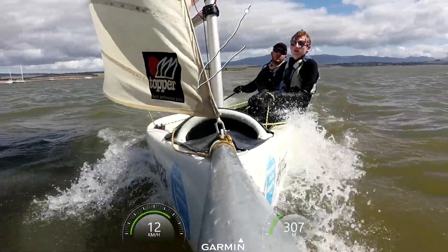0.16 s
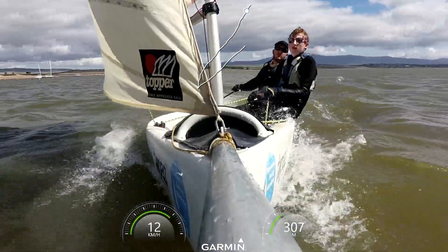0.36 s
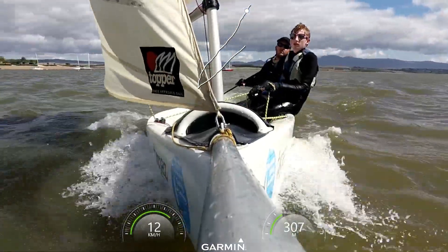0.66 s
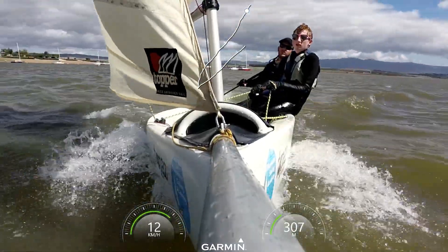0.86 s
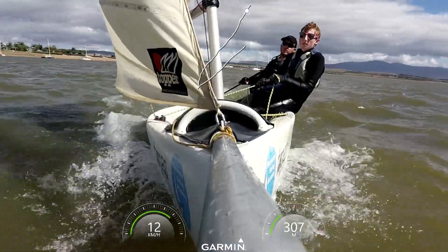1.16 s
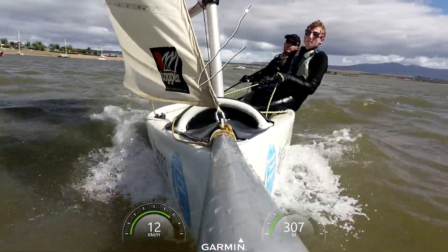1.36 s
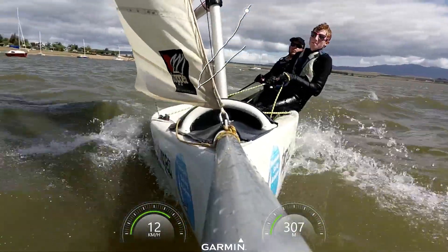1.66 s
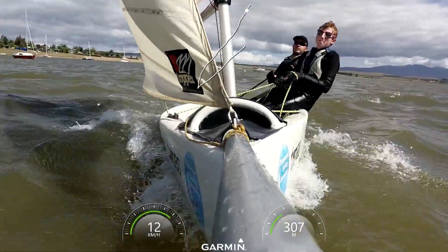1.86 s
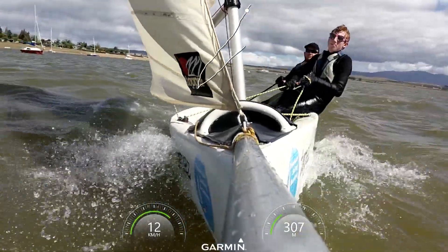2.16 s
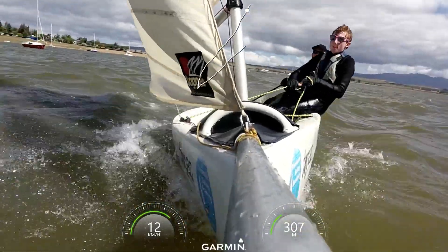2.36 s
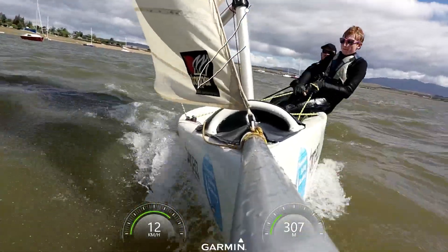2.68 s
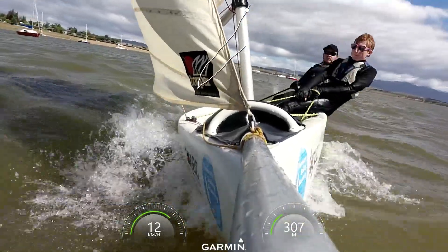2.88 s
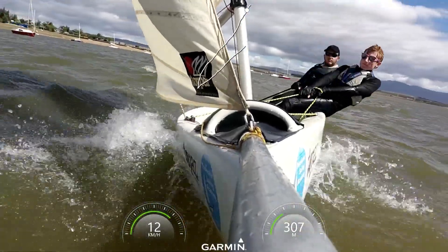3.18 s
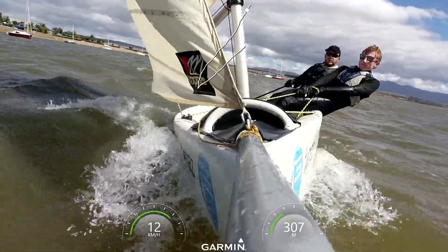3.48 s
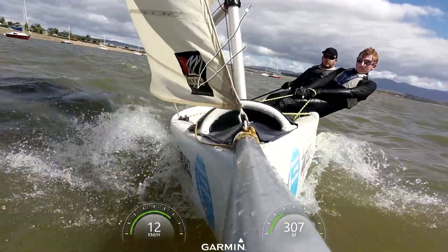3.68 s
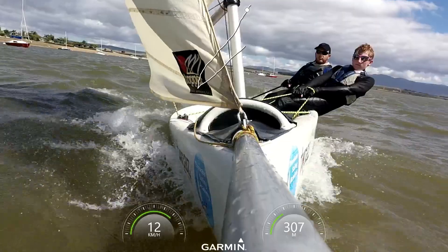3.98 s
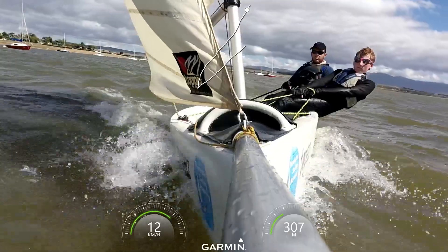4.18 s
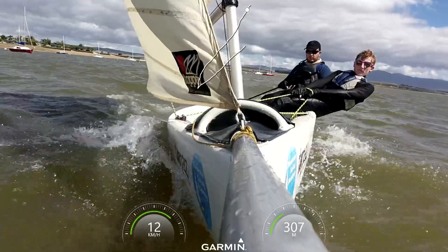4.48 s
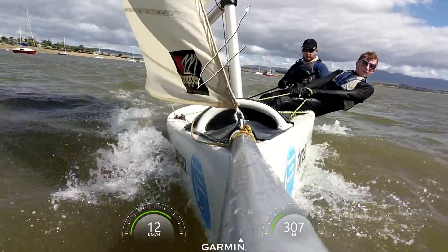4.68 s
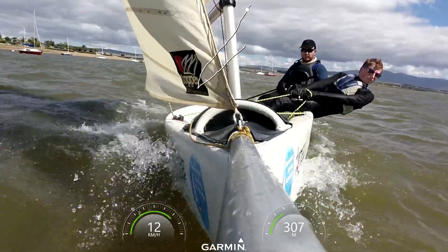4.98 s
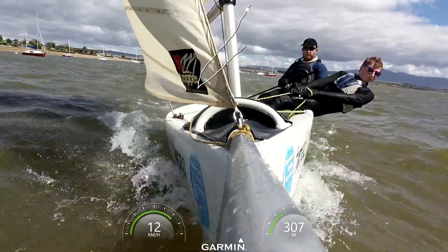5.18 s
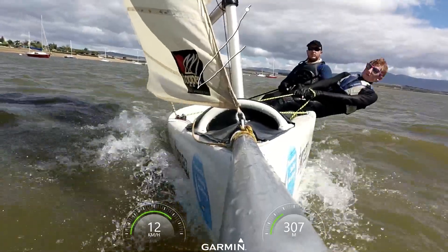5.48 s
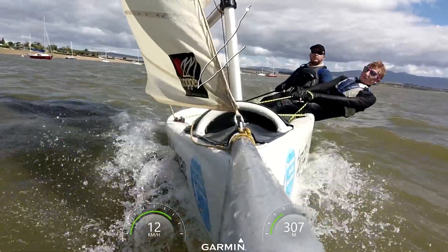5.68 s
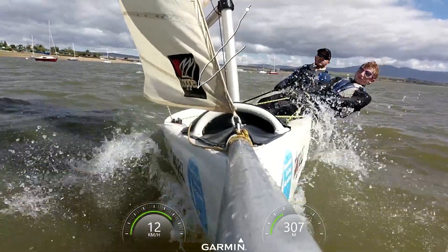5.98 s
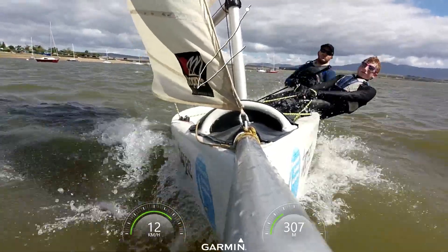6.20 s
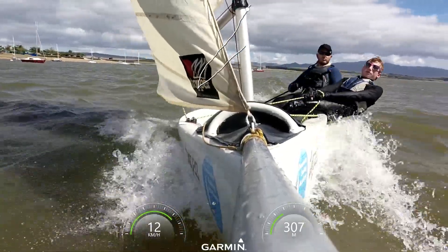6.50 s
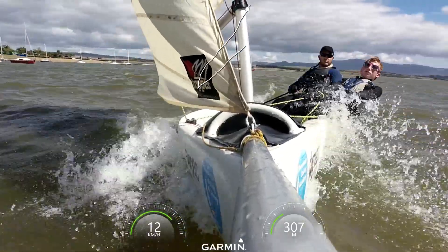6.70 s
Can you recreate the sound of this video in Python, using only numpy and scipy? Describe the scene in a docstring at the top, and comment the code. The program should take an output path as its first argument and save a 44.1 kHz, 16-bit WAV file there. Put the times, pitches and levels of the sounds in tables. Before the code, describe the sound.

Heard from a sealed camera fixed at the bow of a small sailing dinghy, fast low thumps from the fluttering sail dominate, over wind rumble and gurgling wash. Drops knock on the casing and waves slap the hollow hull. The flapping weakens around 1.5 to 2 and 4.5 to 5 seconds, exposing more water. Spray smacks the microphone near 1.9, 6.0 and 6.8 seconds. Treble is muffled.

```python
"""A small dinghy planes through chop, heard by a sealed camera clamped to the bowsprit, with dulled treble.
It opens with the strongest wash; the fluttering foresail thumps the pole about 27 times a second (shaped swings).
Strong flaps pause near 1.5-2 s and 4.5-5.1 s. Drops knock (ringing tones) and waves slap the hull throughout.
Spray hits the camera near 1.9, 6.0 and 6.8 s and overloads the recorder. Water (filtered random drops)
and wind (filtered noise) run from start to end."""
import sys
import numpy as np
from scipy import signal
from scipy.fft import rfft, irfft, next_fast_len
from scipy.io import wavfile
from scipy.ndimage import uniform_filter1d, map_coordinates

SR = 44100
rng = np.random.default_rng(int(sys.argv[2]) if len(sys.argv) > 2 else 0)


def persist_wave(psi):
    """Save psi, clipped to +-1, as 16-bit WAV."""
    counts = np.round(np.clip(psi, -1, 1) * 32767).astype(np.int16)
    wavfile.write(sys.argv[1], SR, np.atleast_2d(counts).T)


N = 301644  # length [samples]

# strong flaps of the sail: (time of deepest pull [s], pull before smoothing [dB], swing rate [Hz],
# push before the pull [share of the pull])
STRONG_FLAPS = [(0.099, -10.5, 111, 0.53), (0.179, -8, 59, 0.2), (0.322, -4.5, 74.7, 0.37),
                (0.433, -13.5, 47.3, 1.6), (0.494, -4.5, 96.0, 0.4), (0.534, -8.5, 128, 0.55),
                (0.648, -9.5, 68.4, 2.75), (0.704, -10, 65, .6), (0.754, -6.5, 54.6, 1.0),
                (0.791, -11.5, 56.5, 1.5), (0.857, -9.5, 56.9, 0.51), (0.944, -8, 53.0, 0.34),
                (0.98, -8, 65, .6), (1.049, -4.5, 64, 0.65), (1.142, -11, 89, 0.6),
                (1.238, -4.5, 83.3, 0.71), (1.374, -8, 73.6, 0.46), (1.418, -6, 72.0, 1.0),
                (1.501, -10, 61.7, 1.5), (1.537, -6.5, 69.4, 0.7), (2.028, -6.5, 49.6, 0.6),
                (2.061, -9, 65, .6), (2.145, -10.5, 70, 1.1), (2.535, -7, 95, 0.53),
                (2.696, -3.5, 75.2, .75), (2.733, -8, 74, 1.9), (2.844, -6.5, 66.6, 0.52),
                (2.918, -8, 75.0, 1.05), (2.998, -11, 58.4, 0.33), (3.115, -9, 73.51, 0.66),
                (3.155, -5, 72, 0.65), (3.314, -7.5, 72, 0.81), (3.477, -8, 61.3, 0.33),
                (3.56, -10, 65, .6), (3.883, -7, 75.0, 0.6), (3.972, -5.5, 84.0, 0.88),
                (4.016, -7.5, 77, 1.85), (4.088, -7, 70, 1.1), (4.158, -3.5, 105, 1.78),
                (4.198, -10, 73.6, 1.5), (4.274, -7.5, 77, 1.7), (4.349, -10.5, 77, 0.55),
                (4.476, -9, 83.0, 0.7), (5.104, -5, 71.7, 0.89), (5.143, -5.5, 65.09, 0.37),
                (5.176, -6.5, 67.6, 0.3), (5.405, -10, 60, .3), (5.485, -5.5, 60.7, 0.91),
                (5.521, -6.5, 75.3, 0.66), (5.56, -12, 63, 0.7), (5.696, -9.5, 53.5, 0.7),
                (6.046, -7, 62.2, 0.8), (6.085, -12, 65, .4), (6.13, -8, 66.0, 0.41), (6.164, -11, 65, .4),
                (6.391, -10.5, 54, 0.3), (6.555, -8.5, 56.3, 1.1), (6.595, -8, 65, .6),
                (6.776, -8, 74.6, 0.32)]
# how hard the cloth beats between strong flaps, before random variation: (time [s], pull [dB])
WEAK_FLAP_LEVEL = [(0, -13), (1.05, -12), (1.3, -17.5), (1.65, -19.5), (1.95, -16.5), (2.1, -10),
                   (2.3, -18), (2.78, -11.5), (3.4, -15.5), (3.85, -16), (4.05, -11), (4.23, -18),
                   (4.31, -10), (4.55, -21), (4.95, -18.5), (5.06, -12), (5.3, -17.5), (5.55, -14),
                   (5.8, -19), (6.17, -14), (6.84, -16)]
# big drops striking: (time [s], ring peak before a -2 dB ceiling [dB], pitch the blow favours [Hz])
BIG_DROPS = [(0.151, -12, 739.9), (0.465, -8, 1035), (0.552, -9.5, 1085), (0.605, -7.5, 842.3),
             (0.62, -7, 1064), (0.678, -9.5, 1099), (1.046, -9, 994.8), (1.144, -10, 761.1),
             (1.204, -11, 1111), (1.365, -6.5, 813), (1.372, -5.5, 1127), (1.382, -3, 831.7),
             (1.391, -5, 660.4), (1.866, -5.5, 842.1), (2.035, -4.5, 800.9), (2.197, -12, 799.6),
             (2.238, -10, 1067), (2.248, -9, 653), (2.255, -7, 960), (2.652, -6.5, 836),
             (2.955, -9.5, 1133), (3.004, -4.5, 650.8), (3.19, -13, 899.6), (3.217, -12, 771),
             (3.319, -12, 943.7), (3.477, -12.5, 1001), (3.543, -14.5, 1189), (3.557, -9, 762.9),
             (3.644, -7, 850), (3.937, -7, 1000), (3.942, -3, 814.4), (4.103, -6.5, 888.8),
             (4.567, -2.5, 859.5), (4.607, -8, 620), (4.675, -13, 1000), (4.694, -13, 1250),
             (4.757, -10, 921), (4.811, -18, 828), (4.834, -4.5, 913.5), (5.179, -11.5, 1045),
             (5.403, -9, 1000), (5.449, -12, 900), (5.455, -13, 880), (6.002, -4, 771.8),
             (6.165, -12.5, 803.8), (6.452, -3, 957.3), (6.515, -10.5, 1062), (6.743, -11, 1150)]
# tones that pole and casing ring with, before detuning:
# (pitch [Hz], relative level [dB], time to fade by 60 dB [s])
CASING_TONES = [(480.4, -10.5, 0.094), (677.78, 5, 0.017635), (888.59, 1.5, 0.024182), (997.33, -1, 0.026),
                (1190.7, -3, 0.03)]
# spray landing straight on the camera: (time of contact [s], level before overshoot [dB], pitch [Hz])
CAMERA_HITS = [(1.871, -1, 899), (6.008, -1, 856), (6.805, -1, 1000)]
# waves slapping the hollow hull: (time [s], level before the fade shape [dB], pitch [Hz])
HULL_SLAPS = [(0.151, -9.5, 318.7), (0.415, -8, 296.3), (0.554, -12, 284.8), (0.624, -10, 297.2),
              (1.337, -12, 319.5), (1.357, -12, 363.6), (1.386, -6.5, 397.8), (1.406, -10, 305.3),
              (1.846, -7.5, 328), (2.25, -11, 358.2), (2.635, -7, 330.8), (2.659, -3.5, 304),
              (3.94, -5, 265.2), (3.957, -7, 273.5), (4.576, -11.5, 356.3), (4.693, -13, 339.3),
              (6.011, -12, 329.7), (6.515, -12, 315.3)]
# handfuls of spray on pole and hull: (time of middle [s], patter level at middle [dB], half-length [s])
SPRAY_GUSHES = [(0.271, -29, 0.035), (0.393, -22, 0.014), (1.029, -22, 0.02), (1.24, -23, 0.012),
                (1.285, -25, 0.024), (1.309, -19, 0.013), (1.337, -19, 0.017), (1.526, -22, 0.018),
                (1.572, -22, 0.023), (1.607, -21, 0.011), (1.688, -25, 0.012), (1.754, -24, 0.02),
                (1.839, -22, 0.028), (1.941, -26, 0.01), (2.005, -23, 0.013), (2.429, -21, 0.032),
                (2.463, -24, 0.041), (2.535, -22, 0.015), (2.576, -23, 0.025), (2.631, -18, 0.023),
                (2.731, -25, 0.018), (2.873, -20, 0.016), (2.916, -21, 0.014), (2.961, -22, 0.026),
                (3.276, -27, 0.019), (3.351, -24, 0.011), (3.433, -23, 0.025), (3.877, -27, 0.025),
                (3.928, -20, 0.027), (4.272, -26, 0.017), (4.482, -25, 0.017), (4.572, -16, 0.021),
                (4.628, -24, 0.02), (5.048, -30, 0.02), (5.286, -25, 0.031), (5.329, -22, 0.016),
                (6.083, -25, 0.011), (6.119, -27, 0.026), (6.474, -22, 0.04), (6.575, -27, 0.041),
                (6.636, -23, 0.033), (6.714, -23, 0.022), (6.748, -19, 0.021), (6.767, -22, 0.029)]
# small bright spatters on the casing: (start [s], level before the fade shape [dB], pitch [Hz])
BRIGHT_TICKS = [(0.104, -22, 2896), (0.588, -14, 3002), (1.744, -31, 3081), (1.819, -24, 2740),
                (2.035, -20.5, 2801), (3.429, -15.5, 2787), (4.118, -20.5, 2750), (4.482, -26, 2780),
                (5.185, -42, 4650), (5.464, -16.5, 2864), (5.622, -16, 2829), (5.721, -24, 2941),
                (5.76, -40, 4400)]
# steady wash along the hull, without splashes: (time [s], surge [dB], drop patter [dB], fizz [dB])
STEADY_WATER = [(0.0, -23, -27.5, -49), (0.34, -25.5, -26, -46), (0.55, -22, -23, -43.5),
                (0.78, -25, -31, -57), (1.2, -27, -31, -59), (1.47, -27.5, -36.5, -63),
                (1.56, -29, -31, -57), (2.0, -28, -31, -59), (2.12, -27.5, -36, -61), (2.5, -30, -31, -58),
                (2.8, -30, -35, -61), (3.4, -30.5, -31, -54), (3.7, -28.5, -35, -56),
                (4.05, -27, -32.5, -61), (4.28, -35, -38, -62), (4.65, -29, -32, -62), (4.9, -36, -38, -54),
                (5.2, -28, -33, -55), (5.64, -34, -36, -54), (5.95, -33, -35, -53), (6.06, -28, -32, -52),
                (6.4, -31.5, -34.5, -49), (6.65, -26, -28.5, -50), (6.84, -28, -31.5, -47)]
# swells of spray thrown at the bow; a long splash is built from overlapping swells:
# (time of peak [s], fizz [dB], build-up over 20 dB [s], die-away over 20 dB [s])
SPRAY_SWELLS = [(0.03, -41, .1, 0.1984), (0.6, -38.5, .1, .12), (0.69, -44, .06, .08),
                (0.96, -44.5, .4, 0.322), (1.33, -41.5, .05, 0.0939), (1.38, -37, .1, 0.0351),
                (1.7, -52, .3, 0.1478), (1.83, -42, .03, 0.15), (1.87, -38, .06, 0.0291),
                (2.04, -42, .09, 0.091), (2.25, -46, .1, 0.094), (2.439, -45.5, .2, 0.2473),
                (2.66, -43.5, .25, 0.1063), (2.87, -43, .08, 0.2617), (2.97, -45, .2, 0.0752),
                (3.19, -47, .03, 0.0839), (3.33, -46, .12, 0.1839), (3.42, -38, .06, 0.1342),
                (3.49, -46, .05, .08), (3.63, -42.5, .06, .1), (3.74, -49, .02, 0.0819),
                (3.94, -37.5, .09, 0.0726), (4.11, -33, .03, 0.0462), (4.27, -52, .04, .06),
                (4.48, -50, .06, .05), (4.56, -39, .04, 0.1415), (4.675, -45, .02, 0.0544),
                (4.82, -48, .03, 0.066), (5.04, -48, .08, 0.0544), (5.13, -39.5, .04, 0.2172),
                (5.2, -43, .08, 0.0755), (5.41, -45, .03, 0.134), (5.46, -43, .06, 0.125),
                (5.65, -44, .15, .2), (5.73, -45, .08, .1), (6.004, -31, .008, .025), (6.04, -42, .03, .04),
                (6.11, -45, .06, .1), (6.46, -35, .07, 0.106), (6.63, -41, .09, 0.0476),
                (6.75, -42, .15, .15), (6.8, -41, .05, .03)]
# airy hiss that drifts slowly: (time [s], level [dB])
AIR_LEVEL = [(0.05, -71.5), (1.63, -81), (3.87, -77), (4.17, -83.5), (5.83, -74), (6.75, -74)]
# wind pressing on the casing: (time [s], level [dB])
GUST_LEVEL = [(0, -24), (1.5, -28), (3, -28), (4.7, -29), (5.3, -26), (6.84, -24)]
# colours of the noises, from low to high: (pitch [Hz], relative strength per Hz [dB])
RUMBLE_COLOUR = [(10, -33.5), (22, -1.5), (45, -1), (90, -13.5), (160, -17), (300, -46), (600, -93.5)]
SURGE_COLOUR = [(70, -41.5), (140, 3), (250, 2.5), (310, 1.5), (370, -1), (460, 1), (600, -13.5),
                (1000, -40.5), (2000, -91)]
PATTER_COLOUR = [(300, -31), (520, -4), (720, -1.5), (920, -0.5), (1100, -5), (1290, -2), (1600, -16),
                 (1900, -35), (3000, -70.5)]
FIZZ_COLOUR = [(1300, -22), (1900, -3.5), (2150, 0.5), (2500, 1.5), (2950, 0), (3500, -12.5), (4000, -26),
               (4600, -60)]
MIST_COLOUR = [(3300, -20), (3800, -1), (4300, -7), (4700, -16), (5500, -22), (11000, -25), (14500, -33)]
HISS_COLOUR = [(3000, -18), (5000, -3), (10000, -5), (12500, -7), (14000, -28.5)]

FLUTTER_HZ = 27.261  # beat of the cloth
TOP_HZ = 15700  # nothing at or above this is kept
CASING_DULLS_DB = 40.5  # loss of a lesser spatter per octave above 3 kHz
GUSH_BODY_DB, GUSH_FIZZ_DB = -3.5, -26.5  # hull and fizz in a gush, relative to patter
# dB gained for each dB that a splash adds to the fizz
SURGE_FOLLOWS, PATTER_FOLLOWS, MIST_FOLLOWS = 0.12, 0.3, 0.88
MIST_DB = -24.5  # finest spray, relative to the steady fizz


def sail():
    """The cloth jerks the pole: strong flaps, with weaker ones keeping the beat and leaning like their neighbours."""
    out = np.zeros(N)
    for s, db, hz, push in STRONG_FLAPS:
        add(out, s - .02, amp(db) * flap(hz, push))
    times, pushes = np.transpose(STRONG_FLAPS)[[0, 3]]
    beats = np.array([0, *times, N / SR])
    for start, stop in zip(beats, beats[1:]):
        steps = max(round((stop - start) * FLUTTER_HZ), 1)
        for s in np.linspace(start, stop, steps + 1)[1:-1]:
            late, size, pitch, lean = rng.standard_normal(4)
            db = np.interp(s, *np.transpose(WEAK_FLAP_LEVEL)) + 1.8 * size
            push = 0.7253 * np.interp(s, times, pushes) ** 0.94 * np.exp(0.1 * lean)
            hz = 62 * np.exp(.12 * pitch)
            add(out, s - .02 + 0.0025 * late, amp(db) * flap(hz, push))
    return out


def flap(hz, push):
    """One swing of the pole: a quick push, a slower pull deepest 20 ms in, then a damped rebound."""
    turns = (np.arange(round(.06 * SR)) / SR - .02) * hz
    # the swing runs faster before the deepest pull, and is still before the push
    turns = np.where(turns < 0, np.maximum(1.4512 * turns, -3 / 4), turns)
    damping = np.exp(-2.2 * np.maximum(turns, 0))
    size = np.where(turns < -1 / 4, push, damping)
    return uniform_filter1d(-size * np.cos(2 * np.pi * turns), size=45)


def knocks():
    """Each drop is a soft hammer: it rings the tones nearest its own pitch and bursts in a short spatter."""
    out, bursts = np.zeros(N), np.zeros(N)
    t = np.arange(round(.06 * SR)) / SR
    for s, db, hz in BIG_DROPS + lesser(count=70, top_db=-18, spread_db=10, hz=925.84, spread=.33):
        ring = np.zeros(len(t))
        for mode, level, t60 in CASING_TONES:
            closeness = np.exp(-(np.log(mode / hz) / 0.23814) ** 2)
            detuned_hz = mode * rng.normal(1, 0.04701)  # slightly detuned at random from blow to blow
            ring += amp(level) * fade(t, t60) * closeness * np.sin(2 * np.pi * detuned_hz * t)
        ring *= soft_start(t, 0.0015508)
        db = min(db, -2)  # keeps each ring short of overload by itself
        add(out, s - .002, amp(db) * ring / np.abs(ring).max())
        burst_db = db - 29 + rng.normal(0, 3)
        add(bursts, s - .003, amp(burst_db) * fade(t, 0.036) * soft_start(t, 0.0016))
    noise = rng.standard_normal(N)
    spatter = coloured(noise, FIZZ_COLOUR) + amp(-16) * coloured(noise, MIST_COLOUR)
    return out + bursts * spatter


def direct():
    """Spray swings the casing wall past full scale, deepest one cycle after contact, then it soon dies away."""
    out = np.zeros(N)
    t = np.arange(round(.04 * SR)) / SR - .003  # zero at the deepest point
    before = np.exp(-(t / .0009) ** 2)
    after = .65 * np.exp(-(t / .0008) ** 2) + .35 * fade(t, .03)
    shape = np.where(t < 0, before, after)
    overshoot_db = 3
    for s, db, hz in CAMERA_HITS:
        swing = shape * np.cos(2 * np.pi * hz * t)
        add(out, s + 1 / hz - .003, -amp(db + overshoot_db) * swing)
    return out


def slaps():
    """Each wave makes the hollow hull boom for a few swings; small ones plop in between."""
    out = np.zeros(N)
    t = np.arange(round(.06 * SR)) / SR
    shape = soft_start(t, 0.0028) * fade(t, 0.04934)
    for s, db, hz in HULL_SLAPS + lesser(count=45, top_db=-16, spread_db=8, hz=340, spread=.4):
        add(out, s - .005, amp(db) * shape * np.sin(2 * np.pi * hz * t))  # starts 5 ms early
    return out


def gushes():
    """Each handful of spray is a brief dense rattle of drops, heard in patter, hull and fizz at once."""
    shape = np.zeros(N)
    for s, db, half_length in SPRAY_GUSHES:
        add(shape, s - half_length, amp(db) * np.hanning(round(2 * half_length * SR)))
    spray = patches(drops(rate=900, spread_db=3.0, smooth_db=-3), depth_db=3.0)
    patter = coloured(spray, PATTER_COLOUR)
    body = amp(GUSH_BODY_DB) * coloured(spray, SURGE_COLOUR)
    fizz = amp(GUSH_FIZZ_DB) * coloured(spray, FIZZ_COLOUR)
    return shape * (patter + body + fizz)


def ticks():
    """Droplets too small to move the pole ring only briefly and high; the casing dulls the lesser ones."""
    out = np.zeros(N)
    t = np.arange(round(.02 * SR)) / SR
    shape = soft_start(t, .0012) * fade(t, 0.01)
    weak = []
    for s, db, hz in lesser(count=70, top_db=-32, spread_db=8.5, hz=3648, spread=.3):
        octaves_above = max(np.log2(hz / 3000), 0)
        weak.append((s, db - CASING_DULLS_DB * octaves_above, hz))
    for s, db, hz in BRIGHT_TICKS + weak:
        add(out, s, amp(db) * shape * np.sin(2 * np.pi * hz * t))
    return out


def water():
    """Hull surge, patter and fizz come in clumps that they partly share; every splash lifts them all."""
    surge_db, patter_db, fizz_db = curves(STEADY_WATER)
    lift_db = splash_db()
    clumps, flicker = wobble(16), wobble(45)

    surge_drops = drops(rate=300, spread_db=4.5, smooth_db=-2.5)
    surge_swell = amp(1.8 * clumps + 1.5 * flicker + 1.5 * wobble(30))
    surge = unit(surge_swell * coloured(surge_drops, SURGE_COLOUR))

    spray = drops(rate=600, spread_db=3.0, smooth_db=-4.5)  # the same drops feed patter, fizz and mist
    patter_swell = amp(1.3 * clumps + 2.4 * flicker)
    patter = unit(patter_swell * coloured(patches(spray, depth_db=2.5), PATTER_COLOUR))

    fine_spray = patches(spray + amp(2.0) * rng.standard_normal(N), depth_db=3.5)
    fizz_swell = amp(0.97 * clumps + 1.6 * flicker)
    fizz = unit(fizz_swell * coloured(fine_spray, FIZZ_COLOUR))

    mist_db = fizz_db + MIST_DB + MIST_FOLLOWS * lift_db + 2.0 * flicker
    return (amp(surge_db + SURGE_FOLLOWS * lift_db) * surge
            + amp(patter_db + PATTER_FOLLOWS * lift_db) * patter
            + amp(fizz_db + lift_db) * fizz
            + amp(mist_db) * coloured(spray, MIST_COLOUR))


def wash():
    """The wake further aft rushes and hisses evenly under the splashes, with a slowly drifting airy hiss."""
    rush = coloured(patches(rng.standard_normal(N), depth_db=2.5), PATTER_COLOUR)
    far_fizz = coloured(patches(rng.standard_normal(N), depth_db=2.5), FIZZ_COLOUR)
    air = amp(curves(AIR_LEVEL)[0]) * coloured(rng.standard_normal(N), HISS_COLOUR)
    return amp(-44.0) * rush + amp(-62.0) * far_fizz + air


def wind():
    """Gusts press on the casing as a rumble in short lumps of bounded size."""
    lumps = amp(4.0 * np.tanh(wobble(14)))
    rumble = unit(lumps * coloured(rng.standard_normal(N), RUMBLE_COLOUR))
    return amp(curves(GUST_LEVEL)[0]) * rumble


def splash_db():
    """How far swells of spray lift the fizz over the steady wash: each builds to its peak and dies away."""
    t = np.arange(0, N / SR, .001)
    bed_db = np.interp(t, *np.transpose(STEADY_WATER)[[0, 3]])
    power = amp(2 * bed_db)  # doubling the dB turns amplitude into power
    for s, db, rise, fall in SPRAY_SWELLS:
        distance = np.where(t < s, (s - t) / rise, (t - s) / fall)
        power += amp(2 * db - 40 * distance)
    return np.interp(np.arange(N) / SR, t, 10 * np.log10(power) - bed_db)


def lesser(count, top_db, spread_db, hz, spread):
    """Random weaker hits as (time [s], level [dB], pitch [Hz]), thickest where the spray flies."""
    when, size, pitch = rng.random((count, 3)).T
    crowd = np.cumsum(amp(0.8 * splash_db()))
    s = np.interp(when, crowd / crowd[-1], np.arange(N) / SR)
    return list(zip(s, top_db - spread_db * size, hz * np.exp(spread * (2 * pitch - 1))))


def drops(rate, spread_db, smooth_db):
    """Random impacts, rate a second, of uneven but bounded size on a bed of plain noise."""
    hit, size, sign = rng.random((3, N))
    strength = amp(-spread_db * np.log(1 - .97 * size))
    spikes = (hit < rate / SR) * strength * np.sign(sign - .5)
    return unit(spikes) + amp(smooth_db) * rng.standard_normal(N)


def patches(x, depth_db):
    """Random louder and softer patches in time and pitch, as water gurgles."""
    z = signal.stft(x, nperseg=256)[2]
    field = uniform_filter1d(rng.standard_normal(z.shape), size=2, axis=0)  # blend across pitch
    field = uniform_filter1d(field, size=5, axis=1)  # blend across time
    return signal.istft(z * amp(depth_db * unit(field)), nperseg=256)[1][:N]


def coloured(x, points):
    """Filter x to a colour read on a log pitch axis, then bring it to rms 1."""
    m = next_fast_len(N + 8192)
    f, db = np.transpose(points)
    pitches = np.fft.rfftfreq(m, 1 / SR)
    gain = amp(np.interp(np.log(pitches + 1), np.log(f + 1), db, right=-140))
    return unit(irfft(rfft(x, m) * gain, m)[:N])


def wobble(rate):
    """A smooth random curve with rate random points a second."""
    points = rng.standard_normal(int(N * rate / SR) + 4)
    return map_coordinates(points, [np.arange(N) * rate / SR])


def curves(rows):
    """One value per sample for each column after the time."""
    s, *cols = np.transpose(rows)
    return [np.interp(np.arange(N) / SR, s, c) for c in cols]


def soft_start(t, rise):
    """A smooth swell from silence to full size in rise seconds."""
    return np.sin(np.pi / 2 * np.minimum(t / rise, 1)) ** 2


def fade(t, t60):
    """A steady die-away, losing 60 dB in t60 seconds."""
    return amp(-60 * t / t60)


def add(track, s, sound):
    """Mix a short sound in at s seconds."""
    part = track[max(round(s * SR), 0):][:len(sound)]
    part += sound[:len(part)]


def amp(db):
    """Turn decibels into a plain multiplier."""
    return 10 ** (np.asarray(db) / 20)


def unit(x):
    """Scale x to rms 1."""
    return x / np.sqrt(np.mean(x ** 2) + 1e-20)


def scene():
    """All sources summed into one channel."""
    boat = sail() + knocks() + direct() + slaps() + gushes() + ticks()
    return (boat + water() + wash() + wind())[None]


def record(dry):
    """The recorder overloads hard at full scale, then cuts off the highest treble."""
    clipped = np.clip(dry, -1, 1)
    keep = np.fft.rfftfreq(N, 1 / SR) < TOP_HZ
    return irfft(rfft(clipped) * keep, N)


dry = scene()
out = record(dry)
persist_wave(out)
```